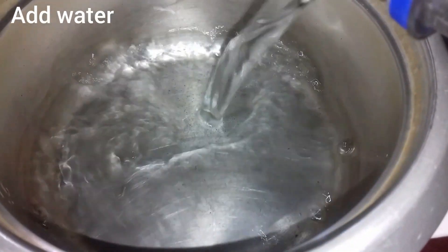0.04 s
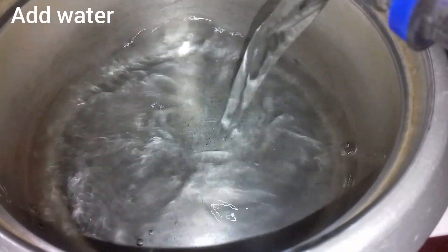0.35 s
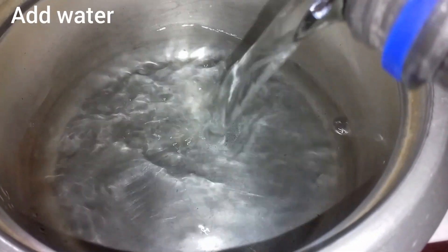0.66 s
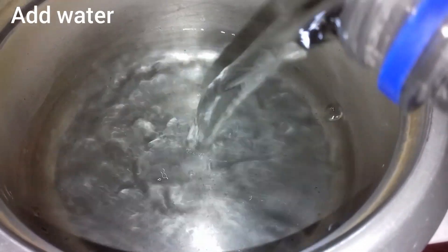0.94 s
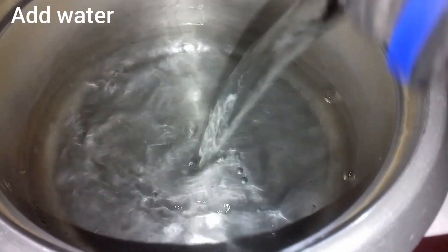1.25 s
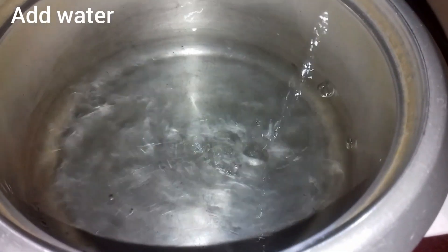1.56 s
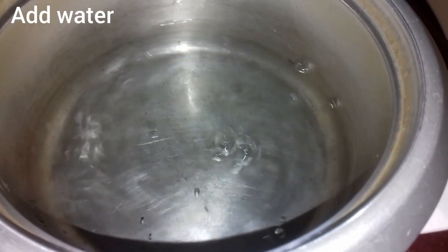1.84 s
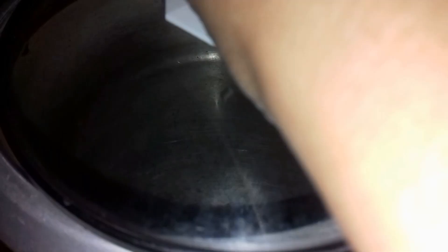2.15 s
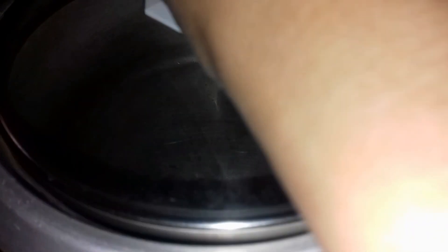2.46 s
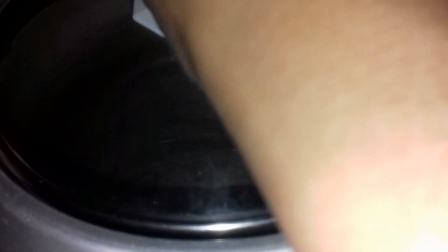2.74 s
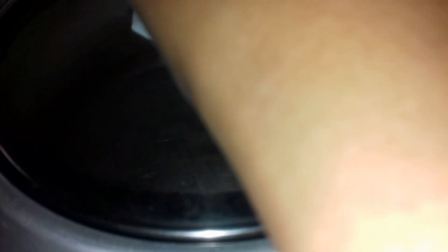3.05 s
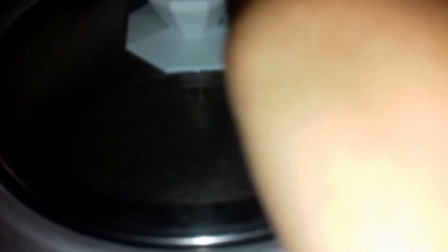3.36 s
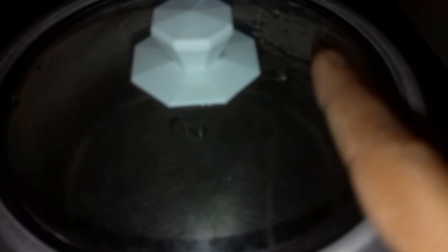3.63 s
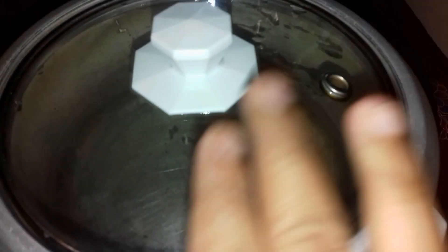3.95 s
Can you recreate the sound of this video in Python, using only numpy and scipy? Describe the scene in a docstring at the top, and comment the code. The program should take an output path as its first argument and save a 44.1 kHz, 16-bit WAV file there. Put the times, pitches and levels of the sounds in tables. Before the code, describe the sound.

Water trickles into a steel pot before its lid clinks down, with steady fan noise.

```python
"""Water is poured from a bottle into a steel pot, close by, over the steady rush of a kitchen fan.
The stream runs almost silently, then spatters, breaks up and ends in a few ringing bubbles.
Just after two seconds all sound stops, then fades back in: a lid scrapes over the rim and clinks
twice, each time in a quick run of hits that make lid and pot ring. Last come a dull bump and a
faint hiss."""
import sys
import numpy as np
from scipy import signal
from scipy.fft import rfft, irfft
from scipy.io import wavfile

SR = 44100
rng = np.random.default_rng(int(sys.argv[2]) if len(sys.argv) > 2 else 0)


def store_pcm(level_fs):
    """Save levels as 16-bit WAV."""
    pcm = np.round(np.clip(level_fs, -1, 1) * 32767).astype(np.int16)
    wavfile.write(sys.argv[1], SR, np.atleast_2d(pcm).T)


N = 176400

# The lid's ringing tones: pitch_hz, struck_db, fade_s, rubbed_db
# Throughout, a fade time is how long a sound takes to fall by 60 dB, and levels are relative.
LID_TONES = [(2003, -5, .09, -16), (2067, -3, .1, -14), (2490, -6, .09, -4), (2670, -2, .1, -1),
             (3140, -4, .11, -7), (3340, -4, .09, -14), (3712, -5, .13, -16), (4540, -15, .11, -3),
             (5140, -14, .17, -16), (6740, -7, .08, -6), (7014, -8, .06, -1), (8027, -14, .055, -3),
             (8190, -19, .07, -6), (9500, -16, .08, -9), (10550, -14, .07, -7)]


def pour():
    """Water spatters, slaps and sprays into the pot, echoing between the steel walls."""
    # Spatters of the stream: start_s, level_db, pitch_hz, length_s
    spatters = [(0.022, -32, 7900, 0.0039), (0.101, -34, 6640, 0.0042), (0.509, -12.5, 8150, 0.004),
                (0.512, -27, 7240, 0.025), (0.546, -22, 10400, 0.008), (0.558, -26.5, 7000, 0.014),
                (0.576, -22, 9200, 0.0044), (0.621, -21, 6150, 0.0047), (0.676, -29.5, 8970, 0.028),
                (0.701, -19, 10500, 0.012), (0.741, -17.5, 10000, 0.0033), (0.8, -23, 11200, .006),
                (0.808, -15.5, 10700, 0.0042), (0.819, -19.5, 7400, 0.0078), (0.84, -24.5, 6840, 0.0078),
                (0.869, -21.5, 6480, 0.0036), (0.959, -28.5, 5800, 0.0069), (0.99, -29, 10600, 0.01),
                (1.088, -27.5, 5790, 0.011), (1.185, -29, 6270, 0.0063), (1.307, -20, 9900, 0.0052),
                (1.32, -28, 8800, 0.013), (1.390, -27.5, 6000, 0.015), (1.509, -26, 5060, 0.0081),
                (1.541, -27, 8400, 0.0087), (1.551, -20, 8080, 0.0094), (1.571, -14.5, 10100, 0.0076),
                (1.623, -14, 9530, 0.0055), (1.665, -25, 7240, 0.0047), (1.69, -22.5, 6600, 0.0039),
                (1.732, -18, 5020, 0.0016)]
    # Lumps of water hitting the surface: start_s, level_db
    slaps = [(0.708, -24), (0.743, -20), (0.809, -23), (0.824, -30), (1.306, -24.5), (1.57, -16.5),
             (1.615, -20.5), (1.724, -21)]
    # How the water's treble falls away: pitch_hz, level_db
    treble = [(11600, 0), (12800, -8), (15000, -11), (16000, -22)]
    water = trickle()
    for start_s, db, hz, length_s in spatters:
        add(water, start_s, amp(db) * spatter(hz, length_s))
    for start_s, db in slaps:
        add(water, start_s, amp(db) * slap())
    t = clock(.25)
    walls = clicks(len(t), per_s=2000, spread_db=0.5) * decay(t, fade_s=0.054) * (t > .0012)
    echo = signal.fftconvolve(water, walls / np.linalg.norm(walls))[:N]
    return amp(-4.5) * colour(water + amp(-1.5) * echo, treble)


def spatter(hz, length_s):
    """A burst of droplets lands, and a tiny bubble pings."""
    t = clock(.1)
    drops = unit(clicks(len(t), per_s=3000, spread_db=2.0)) * np.exp(-(t / length_s) ** 2)
    spray = unit(band(drops, hz, octaves=.25)) + amp(-13) * unit(band(drops, hz=5480, octaves=1.0))
    spray = unit(spray) * np.sqrt(length_s / t[-1] / 2)  # short and long bursts peak about alike
    ping = decay(t, fade_s=.04 * 8000 / hz) * np.sin(2 * np.pi * hz * t)
    ping_db = -6 - 6 * np.log2(hz / 8000)  # low pings are louder as well as longer
    return spray + amp(ping_db) * ping


def slap():
    """A lump of water slaps the surface with a short, sharp crackle."""
    t, length_s = clock(.02), 0.0054
    cracks = clicks(len(t), per_s=3000, spread_db=1)
    return unit(band(cracks, hz=7400, octaves=1.65)) * np.exp(-(t / length_s) ** 2)


def trickle():
    """Countless tiny bubbles of many pitches each ring very briefly."""
    # Strength of the fine spray between spatters: time_s, level_db
    loudness = [(0, -52), (.46, -55.5), (.56, -44.5), (.85, -38.5), (1.15, -48), (1.45, -50.5),
                (1.65, -33.5), (1.8, -54), (2.05, -62)]
    out, t = np.zeros(N), clock(.005)
    middle_hz, octaves, ring_cycles = 7600, 0.62, 12
    pitches = middle_hz * 2 ** (octaves * rng.uniform(-1, 1, size=16))
    births = clicks(N, per_s=1100, spread_db=4.5)
    which_pitch = rng.integers(0, len(pitches), N)
    for k, hz in enumerate(pitches):
        ping = np.exp(-hz * t / ring_cycles) * np.sin(2 * np.pi * hz * t)
        out += signal.oaconvolve(births * (which_pitch == k), ping)[:N]
    return level(loudness) * unit(out)


def bubbles():
    """Each trapped bubble rings and rises in pitch as it nears the surface."""
    # Larger bubbles: start_s, pitch_hz, level_db, fade_s
    large_bubbles = [(0.745, 4180, -33, 0.12), (1.018, 3440, -27, 0.048), (1.391, 5590, -25, 0.1),
                     (1.602, 1004, -18.5, 0.04), (1.617, 2830, -25.5, 0.1), (1.628, 830, -27.5, 0.071),
                     (1.650, 866, -25.5, 0.092), (1.708, 3000, -17, 0.0099)]
    out, t = np.zeros(N), clock(.15)
    attack_s, rise_hz_per_s = 0.00029, 5500
    for start_s, hz, db, fade_s in large_bubbles:
        cycles = hz * t + rise_hz_per_s * t ** 2 / 2
        loudness = amp(db) * (1 - np.exp(-t / attack_s)) * decay(t, fade_s)
        add(out, start_s, loudness * np.sin(2 * np.pi * cycles))
    return out


def lid():
    """The lid slips and skips along the rim and knocks against it; lid and pot both ring."""
    # The sliding lid catches on the rim: start_s, level_db
    skips = [(2.451, -32.5), (2.489, -35), (2.55, -26.5), (2.571, -21), (2.615, -27), (2.841, -42.5),
             (2.893, -40)]
    # The lid strikes the rim: start_s, lid_db, pot_db, clatter_db
    clinks = [(2.568, -25, -26, -38), (2.634, -18, -38, -16.5), (2.639, -14, -42, -17.5),
              (2.658, -17.5, -19.5, -18), (2.670, -17.5, -25, -26), (2.92, -49, -31, -39),
              (2.941, -21, -17, -27), (2.952, -18, -17.5, -16.5), (2.961, -26, -17, -26),
              (2.971, -30, -26, -38)]
    # The pot's ringing tones: pitch_hz, level_db, fade_s
    pot_tones = [(1618, -11, .17), (1945, -13, .16), (2614, -2, .18), (2708, -7, .12), (2782, -8, .12),
                 (3235, -7, .09), (3437, 1, .09), (3485, -2, .09), (3582, -4, .14), (4392, -4, .11),
                 (6239, -23, .29), (11300, -14, .08)]
    t = clock(.4)
    out = scrape(t, points=4)
    for start_s, db in skips:
        add(out, start_s, amp(db) * rub(t))
    for start_s, lid_db, pot_db, clatter_db in clinks:
        tones = amp(lid_db) * ring(LID_TONES, t) + amp(pot_db) * ring(pot_tones, t)
        add(out, start_s, tones + amp(clatter_db) * clatter(t))
    return out


def scrape(t, points):
    """The lid slips unevenly at several touching points, and each one rings differently."""
    # Strength of the slide along the rim: time_s, level_db
    loudness = [(2.40, -45.5), (2.50, -35.5), (2.60, -33.5), (2.68, -40), (2.77, -80), (2.85, -43),
                (2.94, -44), (3.0, -70)]
    slips = clicks(N, per_s=200, spread_db=0)
    which_point = rng.integers(0, points, N)
    rings = sum(signal.oaconvolve(slips * (which_point == k), rub(t))[:N] for k in range(points))
    bright = signal.lfilter(*signal.butter(1, 6600, "high", fs=SR), rings)
    return level(loudness) * unit(bright)


def rub(t):
    """The lid gives a bright, gritty ring when its edge catches on the rim."""
    tones = [(hz, rubbed_db, fade_s) for hz, _, fade_s, rubbed_db in LID_TONES]
    return ring(tones, t, detune=.008) + amp(-2.5) * clatter(t)


def ring(tones, t, detune=.002):
    """Struck metal rings with fading tones, a little different at each touch."""
    out, contact_s = np.zeros(len(t)), .0003
    for hz, db, fade_s, *_ in tones:
        pitch_hz = hz * (1 + detune * rng.standard_normal())
        out += amp(db) * decay(t, fade_s) * np.sin(2 * np.pi * (pitch_hz * t + rng.random()))
    return out * (1 - np.exp(-t / contact_s))


def clatter(t):
    """Crowded metal tones die fast, roughened by tiny bounces, and linger faintly in the room."""
    # Tone colour of each touch: pitch_hz, level_db
    tone_colour = [(60, -47), (250, 6), (700, 0), (1400, 4.5), (3500, 5.5), (3950, -2), (4400, 2.5),
                   (6100, -1), (6900, 5.5), (7500, -3.5), (9500, -1), (11600, -1), (12800, -15),
                   (16000, -24)]
    bounces = unit(1 + 10 * abs(band(noise(len(t)), hz=500, octaves=0.79)))
    loudness = bounces * decay(t, fade_s=0.046) + amp(-6) * decay(t, fade_s=0.16)
    return unit(colour(noise(len(t)), tone_colour)) * loudness


def bumps():
    """Handling makes dull bumps: a short knock that falls in pitch, with a low thump."""
    # Bumps: start_s, knock_db, thump_db, pitch_hz (the knock starts above this and falls past it)
    hits = [(0.9723, -25, -25.5, 1500), (1.988, -29.5, -34, 850), (3.611, -18, -24, 1780)]
    out, t = np.zeros(N), clock(.08)
    knock_s, fall_s, thump_hz, thump_s = 0.0014, 0.00397, 117, 0.0021
    for start_s, knock_db, thump_db, hz in hits:
        cycles = 1.31 * hz * fall_s * (1 - np.exp(-t / fall_s))
        knock = t / knock_s * np.exp(1 - t / knock_s) * np.sin(2 * np.pi * cycles)
        thump = t / thump_s * np.exp(1 - t / thump_s) * np.sin(2 * np.pi * thump_hz * t)
        add(out, start_s, amp(knock_db) * knock + amp(thump_db) * thump)
    return out


def hiss():
    """A faint high hiss swells and fades near the end."""
    peak_s, width_s = 3.62, 0.19
    swell = np.exp(-((np.arange(N) / SR - peak_s) / width_s) ** 2)
    return amp(-55.5) * swell * unit(band(noise(N), hz=9900, octaves=0.26))


def fan():
    """The fan moves air in a steady, slightly fluttering rush, with a faint wavering hum."""
    # Tone colour of the rushing air: pitch_hz, level_db
    tone_colour = [(20, -28.5), (55, -14.5), (100, -7), (135, -7.5), (172, 1.5), (290, -2), (420, -3),
                   (590, 4), (760, -2.5), (1100, 3.5), (1650, -1), (2300, -5.5), (3400, -6.5),
                   (4200, -14.5), (6000, -21.5), (7900, -29), (9600, -23.5), (12500, -37.5), (16000, -38)]
    flutter_db = 1.12 * unit(band(noise(N), hz=6.5, octaves=2.15))
    air = amp(-35.5 + flutter_db) * unit(colour(noise(N), tone_colour))
    hum = amp(-56.5) * unit(band(noise(N), hz=190.9, octaves=0.033))
    return air + hum


def amp(db):
    """Turns decibels into a number to multiply by."""
    return 10 ** (np.asarray(db) / 20)


def unit(x):
    """Scales a sound to an average strength (rms) of 1."""
    return x / np.sqrt(np.mean(x ** 2) + 1e-20)


def clock(length_s):
    """The time of each sample, in seconds."""
    return np.arange(int(length_s * SR)) / SR


def level(points):
    """Loudness over time from (time_s, level_db) points, silent outside them."""
    times, db = np.transpose(points)
    return amp(np.interp(np.arange(N) / SR, times, db, left=-200, right=-200))


def colour(x, points):
    """Turns pitches up or down along a curve of (pitch_hz, level_db) points."""
    hz, db = np.transpose(points)
    pitches = np.fft.rfftfreq(len(x), 1 / SR)
    gain = amp(np.interp(np.log(pitches + 1), np.log(hz), db))
    return irfft(rfft(x) * gain, len(x))


def band(x, hz, octaves):
    """Keeps the pitches within so many octaves either side of hz."""
    edges = np.minimum([hz / 2 ** octaves, hz * 2 ** octaves], [SR / 3, SR / 2 - 1])
    return signal.sosfilt(signal.butter(2, edges, "band", fs=SR, output="sos"), x)


def decay(t, fade_s):
    """Falls by 60 dB in fade_s seconds."""
    return np.exp(-np.log(1000) * t / fade_s)


def noise(size):
    """An even hiss that holds all pitches."""
    return rng.standard_normal(size)


def clicks(size, per_s, spread_db):
    """Random clicks whose strength varies by spread_db."""
    strength = amp(spread_db * np.minimum(rng.exponential(1, size), 4))
    return strength * rng.choice([-1, 1], size) * (rng.random(size) < per_s / SR)


def add(mix, start_s, sound):
    """Mixes a sound in at start_s."""
    part = mix[round(start_s * SR):][:len(sound)]
    part += sound[:len(part)]


def scene():
    """Left and right are nearly alike; the treble spreads a little, the water's most of all."""
    # How far the sound spreads to the sides: pitch_hz, level_db
    width = [(60, -32.5), (2500, -59.5), (4400, -38.5), (7500, -10.5), (15000, -21)]
    middle = fan() + pour() + bubbles() + lid() + bumps() + hiss()
    side = colour(fan() + amp(3.5) * pour() + lid(), width)
    return np.array([middle + side, middle - side])


def record(dry):
    """The sound stops dead and fades back in; the deepest bass and highest treble are cut."""
    stop_s, return_s, fade_in_s = 2.047, 2.401, 0.42
    lowest_hz, highest_hz = 67, 15850
    t = np.arange(N) / SR
    volume = (t < stop_s) + np.clip((t - return_s) / fade_in_s, 0, 1)
    thinned = signal.lfilter(*signal.butter(2, lowest_hz, "high", fs=SR), dry)
    treble_cut = signal.firwin(511, highest_hz, window=("kaiser", 9), fs=SR)
    return signal.oaconvolve(thinned * volume, treble_cut[None], "same")


dry = scene()
out = record(dry)
store_pcm(out)
```